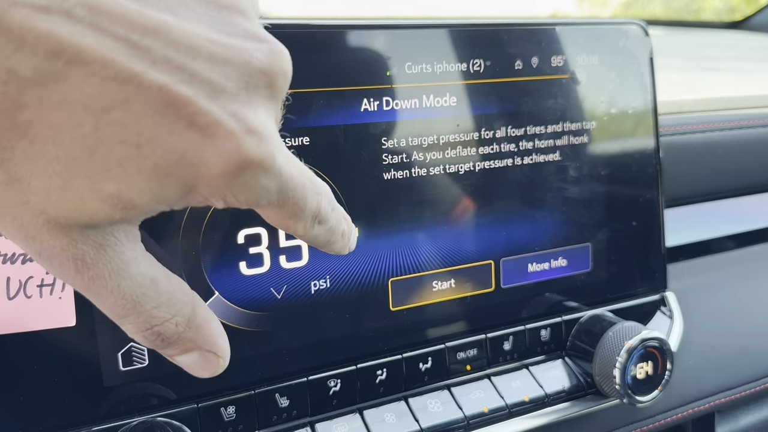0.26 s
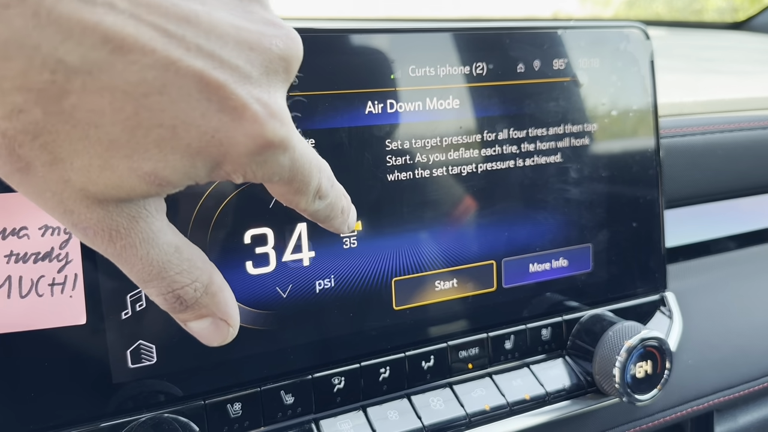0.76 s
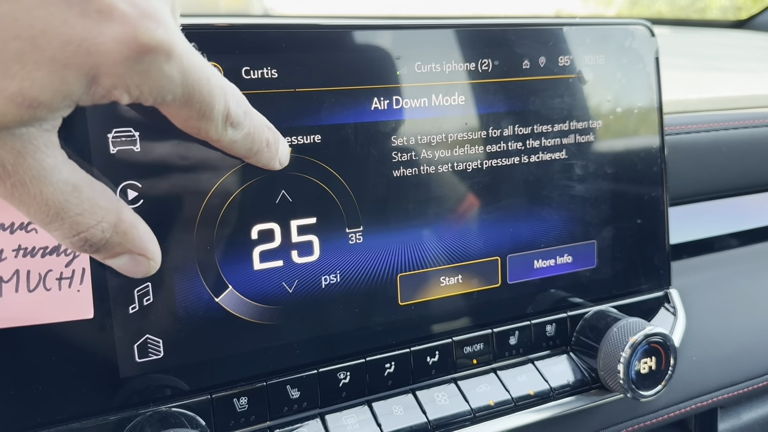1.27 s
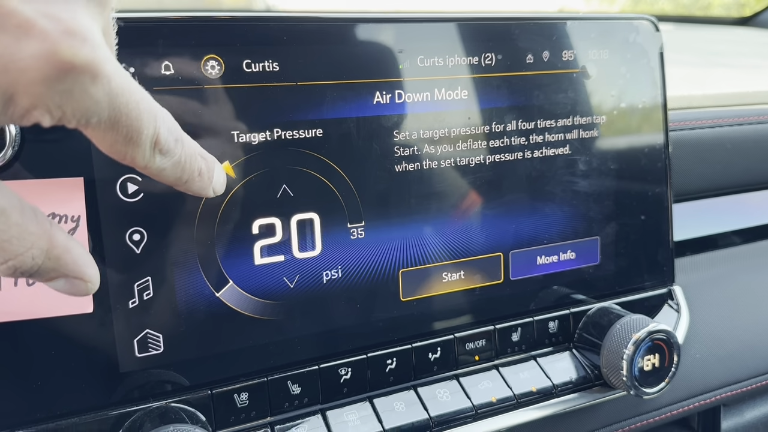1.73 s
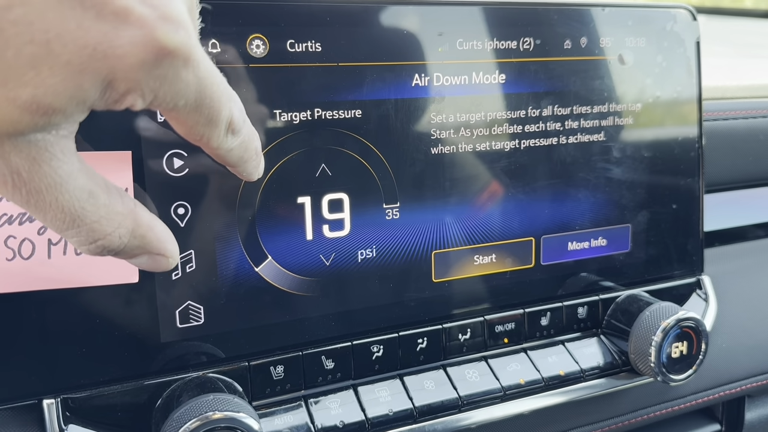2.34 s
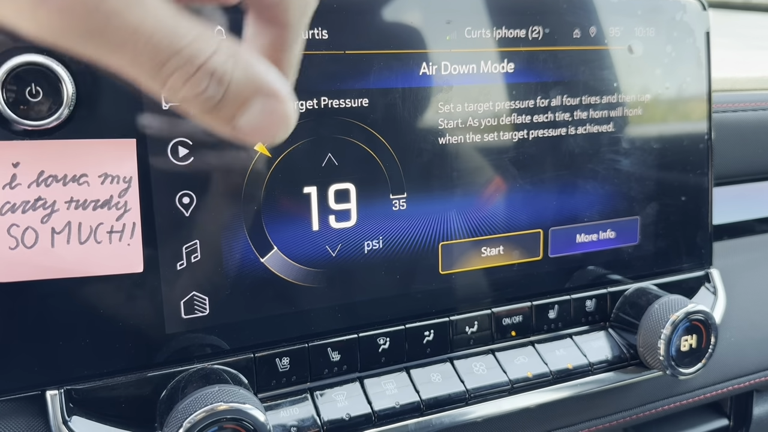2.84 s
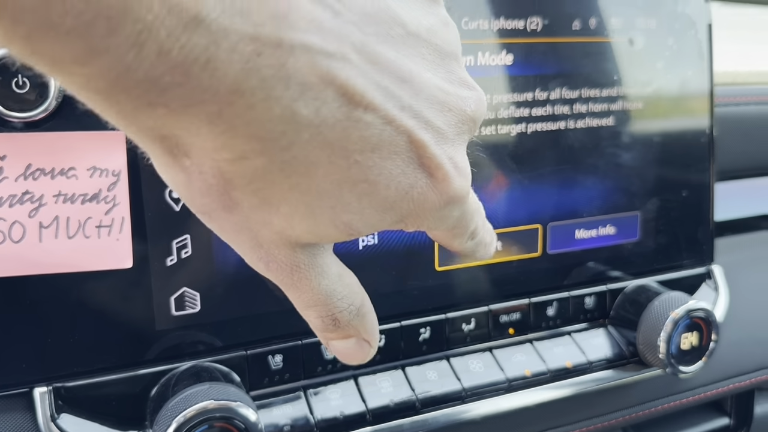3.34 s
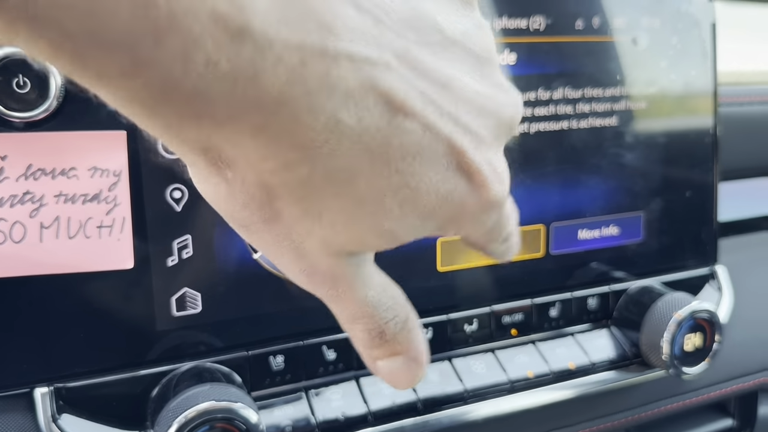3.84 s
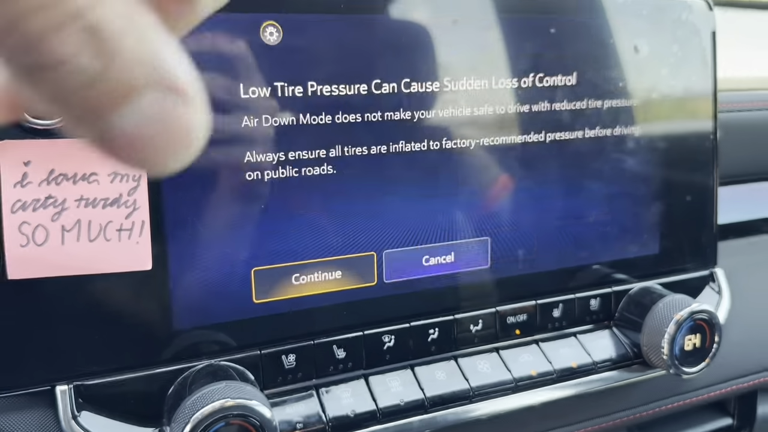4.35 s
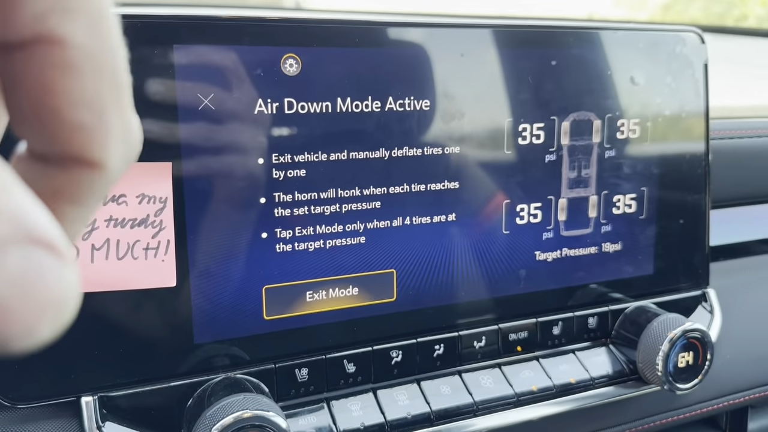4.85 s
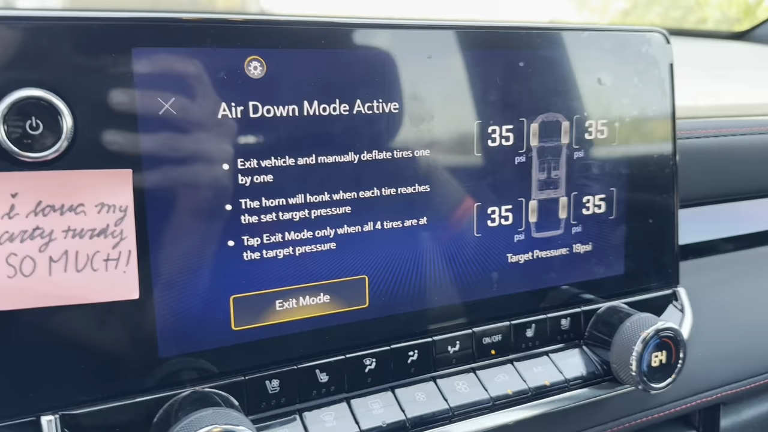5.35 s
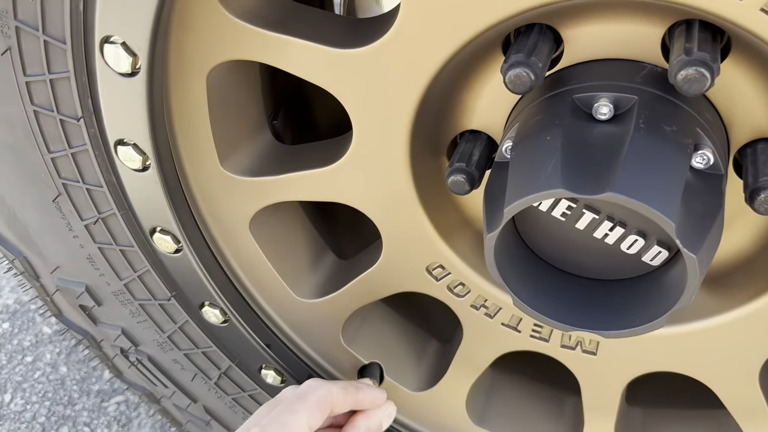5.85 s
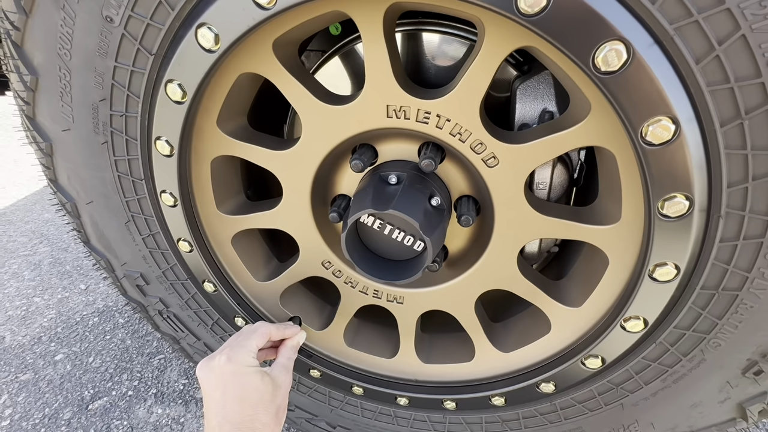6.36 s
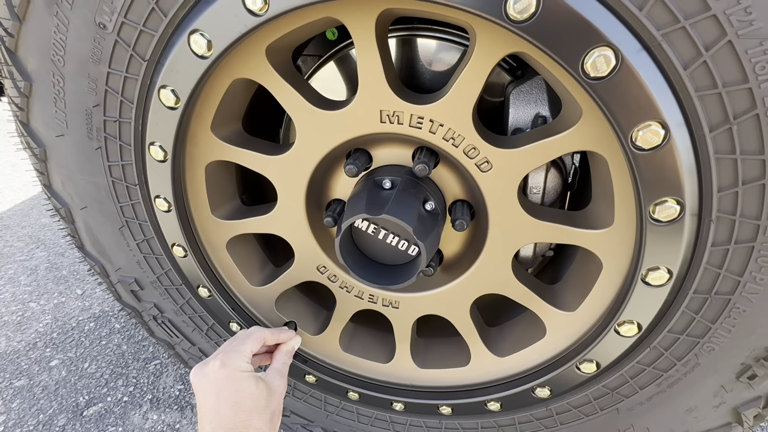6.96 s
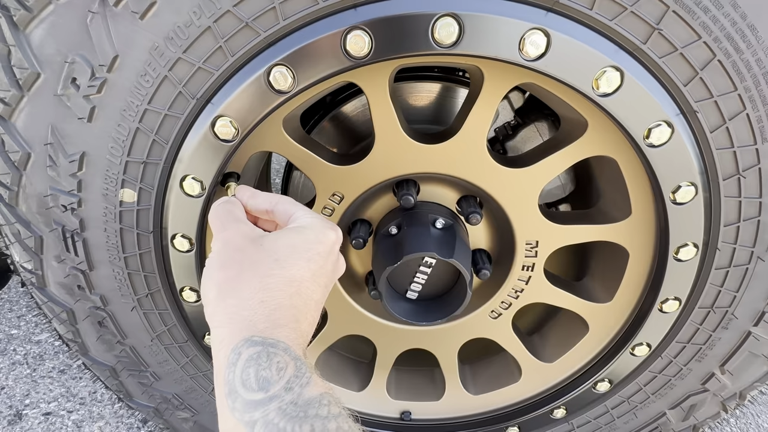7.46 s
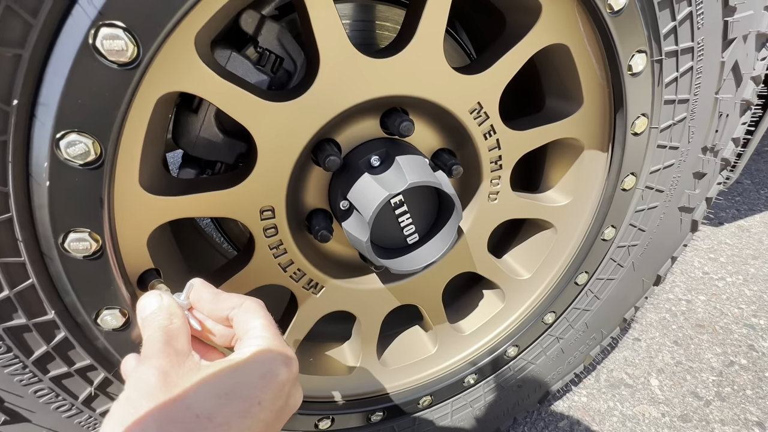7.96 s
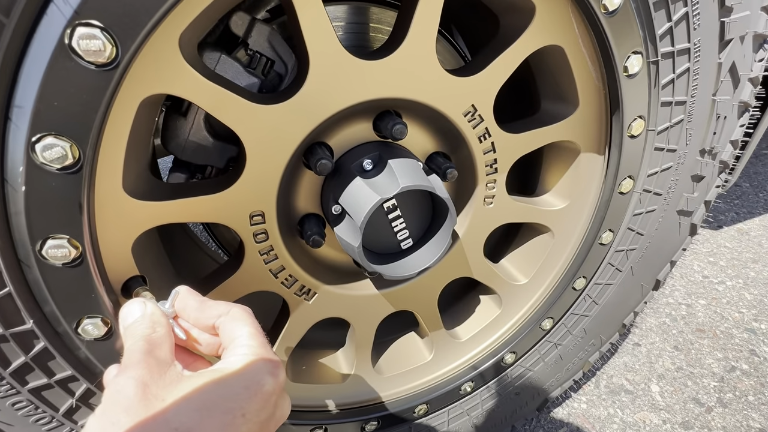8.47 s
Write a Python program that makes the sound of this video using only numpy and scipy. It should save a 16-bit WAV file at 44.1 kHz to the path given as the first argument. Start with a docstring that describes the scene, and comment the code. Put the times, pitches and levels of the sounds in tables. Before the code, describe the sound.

Quiet cabin idle and faint vent air give way to four close, loud jets of air escaping tires, the last one crackling and fluttering.

```python
"""In the cabin of an idling vehicle: engine hums from sine waves, rumble, vent noise and faint hiss
from coloured noise, and soft thumps from short low sines. Then outdoors, close to tire valves:
air jets of echoing noise at four positions, with a falling tone at the first; at the last a bright
band climbs and eddies of air buffet the microphone as snaps that drop into wobbles. The cabin returns
at the end. Short fades through silence interrupt the cabin and join the scenes."""
import sys
import numpy as np
from scipy import signal
from scipy.fft import rfft, irfft, next_fast_len
from scipy.io import wavfile

SR = 44100
rng = np.random.default_rng(int(sys.argv[2]) if len(sys.argv) > 2 else 0)


def generate_wav(signal):
    """Clip the signal to [-1, 1] and save it as 16-bit WAV at the path in sys.argv[1]."""
    frames = np.transpose(np.atleast_2d(signal))
    scaled = np.clip(frames, -1, 1) * 32767
    pcm = np.round(scaled).astype(np.int16)
    wavfile.write(sys.argv[1], SR, pcm)


N = 383669
TIME = np.arange(N) / SR

# Moments of silence, in the cabin and between positions. Column: time_s
SILENCES_S = [1.937, 4.47, 5.669, 6.071, 7.403, 7.804, 8.637]
FADE_S = 0.033
CUTOFF_HZ = 15850   # top of the treble

FIRING_HZ = 24.97
# Engine hums at multiples of the firing rate. Columns: multiple, cabin_level_db, outside_level_db
ENGINE_ORDERS = [(2, -43.5, -44), (3, -46, -45), (4, -49, -42.5), (5, -47.5, -43.5), (6, -61, -45.5)]
# Steady accessory hums and a thin whine. Columns: pitch_hz, level_db
CABIN_HUMS = [(114.5, -43.5), (3128, -84.5)]
# Colour of the cabin rumble. Columns: frequency_hz, level_db_per_hz
CABIN_RUMBLE_COLOUR = [(20, -33.5), (40, -6.5), (130, -8), (160, -18.5), (300, -47), (1000, -120)]
# Loudness of the cabin rumble over time. Columns: time_s, level_db
CABIN_RUMBLE_LEVEL = [(0, -43), (.4, -42), (3.5, -39), (4.7, -39), (5.66, -37), (8.64, -52)]
# Colour of the air vents. Columns: frequency_hz, level_db_per_hz
VENT_COLOUR = [(150, -9.5), (450, -11), (750, -15), (2150, -31), (2900, -40), (5000, -47.5), (8500, -57.5),
               (12000, -64.5), (15000, -72.5)]
# Resonances of the vent ducts. Columns: centre_hz, boost_db
DUCT_RINGS = [(1350.0, 4.5), (1960.0, 4.0), (3130.0, 3.5)]
VENT_DB, LAST_VENT_DB = -46, -36   # the vents are louder in the closing scene
# Airy swishes. Columns: start_s, rise_s, level_db, centre_hz, width_ratio
AIRY_SWISHES = [(0.0, .04, -61.0, 2250.0, 1.7), (4.62, .22, -78.0, 6500.0, 1.12),
                (4.55, .3, -66.0, 2200.0, 1.7)]
SWISH_DECAY_S = 0.25
# Faint rustles of hiss. Columns: full_level_at_s, hold_s, level_db
HISS_SWELLS = [(0.0, .26, -77), (.797, .005, -77), (2.867, .02, -69.5), (3.088, 0.053, -70),
               (3.955, 0.054, -71), (4.073, .05, -67), (4.15, 0.19, -70.5), (4.405, .015, -77),
               (5.23, 0.079, -60), (5.34, 0.17, -62.5), (5.58, 0.084, -69), (8.635, .06, -57)]
# Colour of those rustles. Columns: frequency_hz, level_db_per_hz
HISS_COLOUR = [(3000, -8), (7000, -7), (8900, 0), (11500, -6), (15600, -7.5)]
SWELL_RISE_DB_PER_S, SWELL_FALL_DB_PER_S = 279, 250
# Soft pushes on the body. Columns: start_s, envelope_peak_db
BODY_THUMPS = [(2.306, -25.5), (2.758, -27), (3.076, -25.5), (4.957, -25), (5.4, -22.5), (5.578, -24.5)]
THUMP_HZ, THUMP_RISE_S = 70, 0.012

# One row per valve position. Columns: jet_start_db, jet_end_db, rumble_db
VALVE_LEVELS = [(-16.5, -18.5, -31.5), (-19.0, -19, -34.5), (-19, -19.5, -39.5), (-20.0, -20.5, -45)]
# Colour of the valve jet, one list per position. Columns: frequency_hz, level_db_per_hz
JET_COLOURS = [
    [(500, -13), (1750, -14.5), (2000, -9), (2800, -5.5), (4800, -10.5), (6700, -4.5), (7900, -8),
     (11300, 0.5), (13800, 0), (15600, -1.5)],
    [(700, -13.5), (1900, -14), (3000, -4.5), (3900, -8.5), (6600, -9.5), (11000, -2.5), (13600, -3),
     (14900, -5.5), (15600, -4)],
    [(500, -19.5), (1400, -24), (2600, -8.5), (5900, -5.5), (8400, -5.5), (9700, -2), (11800, -5.5),
     (15600, -5.5)],
    [(500, -21), (1800, -15.5), (2500, -15), (4000, -9), (7400, -1), (9500, -2), (11500, -7), (15600, -4)],
]
# Narrow boosts and dips in the jet's colour, one list per position. Columns: centre_hz, boost_db
JET_PEAKS = [
    [],
    [(2420, -6.0), (3490, -9.0), (3890, -10.0), (15480, 4.0)],
    [(4880, -8.0)],
    [(7530, 2.0)],
]
PEAK_WIDTH = 0.032   # width of these peaks and the duct rings, as a share of the centre frequency
# Colour of the rumble outdoors. Columns: frequency_hz, level_db_per_hz
OUTSIDE_RUMBLE_COLOUR = [(20, -39), (45, -9.5), (90, 5), (130, 0), (280, -10.5), (500, -15.5), (900, -45),
                         (3000, -100)]
# Hums outdoors, one list per position. Columns: pitch_hz, level_db
OUTSIDE_HUMS = [
    [(73.0, -32), (117.0, -38), (175.0, -39)],
    [(90.0, -46)],
    [],
    [],
]
WHEEL_ECHO_DB, ECHO_PEAK_S = -14.0, 0.0012   # level of the wheel echoes; delay of the strongest echoes
RIPPLE_DB, RIPPLE_CHANGES_PER_S = -13.0, 9.0   # wandering ripples in the hiss colour
# A short soft tone. Columns: start_s, end_s, from_hz, to_hz, level_db
SOFT_FALL = (5.79, 5.95, 695.0, 635.0, -40.0)
# A bright band that climbs at the last valve. Columns: from_hz, to_hz, level_db, width_ratio
CLIMBING_BAND = (6800, 7450, -30, 1.07)

# Eddies of the jet, envelope levels. Columns: start_s, snap_db, wobble_peak_db
JET_EDDIES = [(7.842, -14.5, -35), (7.876, -19, -31), (7.894, -8.5, -24.5), (7.987, -19, -21.5),
              (8.0, -20, -34), (8.031, -14.5, -34), (8.054, -9.5, -23.5), (8.1, -17.5, -31.5),
              (8.247, -16, -28), (8.321, -16.5, -32), (8.363, -14.5, -22.5), (8.38, -19, -24),
              (8.391, -23.5, -29), (8.43, -6.5, -34), (8.453, -7.5, -25.5), (8.473, -15, -25.5),
              (8.547, -15.5, -33), (8.567, -19, -27.5)]
SNAP_RISE_S, SNAP_DECAY_S, WOBBLE_RISE_S = 0.00047, 0.0016, 0.0092
WOBBLE_HZ, SNAP_EXTRA_HZ = 53.2, 1662   # final pitch, and how far above it the snap starts
SLOWING_S, SLOWING_SPREAD_DB = 0.003044, 4.64   # middle time scale of the pitch fall; its random spread
STIR_DB, STIR_S = -10, 0.0047   # rough airflow around each snap: level relative to the snap, fade time
# Colour of the rough airflow. Columns: frequency_hz, level_db_per_hz
STIRRED_COLOUR = [(100, -9), (400, 6), (1200, 3.5), (2000, -5), (3000, -42)]
WAKE_DB, WAKE_RISE_S = -5.5, 0.019   # lumpy wake after each eddy: level relative to its wobble, rise
# Colour of the wake. Columns: frequency_hz, level_db_per_hz
LUMPY_WAKE_COLOUR = [(80, -1), (300, -11.5), (700, -25)]

# Stereo balance in the cabin. Columns: frequency_hz, left_minus_right_db, likeness_0_to_1
PAIR_CABIN = [(40, 1.5, 0.88), (500, 2.5, 0.85), (1020, 2, 0.35), (1700, -5.5, 0.35), (1900, -1, .45),
              (7000, 5.5, 0.3), (8700, -.5, 0.93), (10800, 0, 0.99)]
# Stereo balance, first valve. Columns: frequency_hz, left_minus_right_db, likeness_0_to_1
PAIR_FIRST = [(60, 1.5, 0.88), (1400, 0.5, 0.35), (1900, 0, 0.88), (3100, 0, 0.9), (3800, 2.5, 0.4),
              (4300, 0, 0.92), (6000, 1, 0.85), (7700, 3, 0.55), (11300, 0, 1), (14500, 0, .96)]
# Stereo balance, second valve. Columns: frequency_hz, left_minus_right_db, likeness_0_to_1
PAIR_SECOND = [(60, 1.5, .8), (1300, 3, .3), (2600, -4, .45), (2950, 0, .99), (3300, 1, .6), (3900, 0, .92),
               (5700, 1, .2), (7200, 1, .85), (8500, 2, .25)] + PAIR_FIRST[-2:]
# Stereo balance, third valve. Columns: frequency_hz, left_minus_right_db, likeness_0_to_1
PAIR_THIRD = [(60, -6, 0.7), (1000, 0, 0.2), (2300, 7, 0.45), (3200, 0, 1), (3600, 0, .99), (4000, -1, .2),
              (5800, -9.5, 0.6), (7600, -5, 0.75), (13400, 0, 1)]
# Stereo balance, fourth valve. Columns: frequency_hz, left_minus_right_db, likeness_0_to_1
PAIR_FOURTH = [(1760, -4, 0.6), (2600, -1, 0.35), (3800, -1, 0.88), (4900, -5.5, 0.3), (6900, -9, 0.65),
               (7600, -6, .92), (9400, .5, 0.99), (10700, -1, 0.7), (13400, 0, 1)]
# Stereo balance of the eddies. Columns: frequency_hz, left_minus_right_db, likeness_0_to_1
PAIR_EDDY = [(60, -17.5, 0.78), (317, -15, 0.79), (564, 1, 1), (1600, -3.5, 0.27)]
# The microphone ports are a few centimetres apart, so the right one leads or lags in phase.
# Right port's lead in the cabin. Columns: frequency_hz, lead_half_turns
LEAD_CABIN = [(0, 0), (1650, -.95), (1850, -.1), (6900, -.3), (7700, -1.1), (8000, -2), (9000, -2),
              (10700, -1), (12000, -1), (13500, 0)]
# Right port's lead, first valve. Columns: frequency_hz, lead_half_turns
LEAD_FIRST = [(0, 0), (2500, -.1), (2950, -1), (3850, -1), (4050, -2), (6300, -2.1), (7650, -3), (7900, -2),
              (11100, -1), (11600, -1), (14300, 0), (15800, .3)]
# Right port's lead, second valve. Columns: frequency_hz, lead_half_turns
LEAD_SECOND = [(0, 0), (1300, -.7), (2500, -.4), (2950, -1),
               (3400, -1.3)] + LEAD_FIRST[3:5] + [(5900, -2.1), (6600, -2.6), (7200, -2)] + LEAD_FIRST[7:]
# Right port's lead, fourth valve; the third shares its upper part. Columns: frequency_hz, lead_half_turns
LEAD_LATER = [(1700, -.2), (2900, -1), (3250, 0), (6800, .6), (7700, .1), (8200, .6), (9400, 1), (10500, 0),
              (11500, 0), (13200, -1), (13700, -1), (15300, -2)]
# Right port's lead, third valve. Columns: frequency_hz, lead_half_turns
LEAD_THIRD = [(0, 0), (2500, .2), (2950, 1), (3650, 1), (5000, 2), (5800, 2.8),
              (7500, 2)] + [(hz, half + 2) for hz, half in LEAD_LATER[5:]]
# Right port's lead for the eddies. Columns: frequency_hz, lead_half_turns
LEAD_EDDY = [(0, .3), (300, .5), (600, 1), (1200, 1.75), (1600, 1.75)]

CABIN_PAIR = (PAIR_CABIN, LEAD_CABIN)
VALVE_PAIRS = [(PAIR_FIRST, LEAD_FIRST), (PAIR_SECOND, LEAD_SECOND),
               (PAIR_THIRD, LEAD_THIRD), (PAIR_FOURTH, LEAD_LATER)]
EDDY_PAIR = (PAIR_EDDY, LEAD_EDDY)


def amp(db):
    """Turn decibels into a gain."""
    return 10 ** (np.asarray(db) / 20)


def at_hz(points, hz):
    """Read every column of a table on a log-frequency axis."""
    table_hz, *columns = np.transpose(points)
    return [np.interp(np.log(hz + 1), np.log(table_hz), column) for column in columns]


def between(start_s, end_s):
    """Sample range between two times."""
    return slice(round(start_s * SR), min(round(end_s * SR), N))


def hump(t, rise_s):
    """A shape that rises to 1 at rise_s, then dies away."""
    return t / rise_s * np.exp(1 - t / rise_s)


def drift(n, rate):
    """Slow chance: a new random value about rate times a second (60 at most), joined by straight lines."""
    knots = rng.standard_normal(int(n / SR * 60) + 3)
    return np.interp(np.arange(n) * min(rate, 60) / SR, np.arange(len(knots)), knots)


def heard_by_pair(shared, own, pair):
    """Spectra at two ports: a shared part with level and phase offset, plus a part only the right gets."""
    balance, phase = pair
    hz = np.linspace(0, SR / 2, len(shared))
    tilt_db, alike = at_hz(balance, hz)
    alike = np.clip(alike, 0, 1)
    lead = np.pi * np.interp(hz, *np.transpose(phase))
    right = alike * np.exp(1j * lead) * shared + np.sqrt(1 - alike ** 2) * own
    return np.array([amp(tilt_db / 2) * shared, amp(-tilt_db / 2) * right])


def noise(n, spectrum, pair, patchy_db, rate, peaks=(), echoes=False):
    """Coloured stereo noise, rms 1; overlapping wide bands flicker partly together, partly alone."""
    m = 2 * next_fast_len(n // 2 + 1)
    hz = np.linspace(0, SR / 2, m // 2 + 1)
    both = heard_by_pair(*rfft(rng.standard_normal((2, m))), pair)
    both = both * amp(at_hz(spectrum, hz)[0])
    boost_db = sum(db / (1 + (2 * (hz / peak_hz - 1) / PEAK_WIDTH) ** 2) for peak_hz, db in peaks)
    both = both * amp(boost_db)
    if echoes:
        both = both * wheel_echoes(m)
    both = both * (hz > 20) * (hz < CUTOFF_HZ)
    out = 0
    together = drift(n, rate / 4)
    place = np.clip(np.log2(hz / 60 + 1e-9) / 1.6, 0, 5)   # band number, each 1.6 octaves apart
    for k in range(6):
        band = irfft(both * np.clip(1 - abs(place - k), 0, 1), m)[:, :n]
        out = out + band * amp(patchy_db * (0.4 * together + drift(n, rate)))
    return out / np.sqrt(np.mean(out ** 2))


def hums(n, tones, waver_db):
    """Steady sine tones whose levels waver slowly."""
    t = np.arange(n) / SR
    out = 0
    for hz, db in tones:
        level = np.sqrt(2) * amp(db + waver_db * drift(n, 5.08))
        out = out + level * np.sin(2 * np.pi * (hz * t + rng.random()))
    return out


def engine(n, column):
    """Engine hum: sines at low multiples of the firing rate."""
    return hums(n, [(row[0] * FIRING_HZ, row[column]) for row in ENGINE_ORDERS], waver_db=3.0)


def cabin_rumble():
    """Deep coloured noise heard through the closed body."""
    level = amp(np.interp(TIME, *np.transpose(CABIN_RUMBLE_LEVEL)))
    return level * noise(N, CABIN_RUMBLE_COLOUR, CABIN_PAIR, patchy_db=2.0, rate=6.5)


def vents():
    """Air rushing through ducts: broad noise with a few narrow resonances."""
    level = amp(np.where(TIME > SILENCES_S[-1], LAST_VENT_DB, VENT_DB))
    return level * noise(N, VENT_COLOUR, CABIN_PAIR, patchy_db=0.7, rate=3.0, peaks=DUCT_RINGS)


def swishes():
    """Airy swishes: bands of noise that rise in a straight line and die away smoothly."""
    out = np.zeros((2, N))
    t = TIME[:SR]   # each lasts one second
    for start_s, rise_s, db, hz, ratio in AIRY_SWISHES:
        start = round(start_s * SR)
        colour = [(hz / ratio, -20), (hz, 0), (hz * ratio, -30), (hz * ratio * 2, -90)]
        air = noise(SR, colour, CABIN_PAIR, patchy_db=1.0, rate=13.0)
        shape = np.minimum(t / rise_s, np.exp((rise_s - t) / SWISH_DECAY_S))
        out[:, start:start + SR] += amp(db) * shape * air
    return out


def hiss_swells():
    """Rustles of hiss: each rises, holds and falls at steady dB rates; their powers add."""
    power = 0
    for full_s, hold_s, db in HISS_SWELLS:
        early = np.clip(full_s - TIME, 0, None)
        late = np.clip(TIME - full_s - hold_s, 0, None)
        power = power + amp(db - SWELL_RISE_DB_PER_S * early - SWELL_FALL_DB_PER_S * late) ** 2
    return np.sqrt(power) * noise(N, HISS_COLOUR, CABIN_PAIR, patchy_db=2.0, rate=12.0)


def thumps():
    """Soft pushes on the body: two or three cycles of a low sine under a hump."""
    out = np.zeros(N)
    for start_s, db in BODY_THUMPS:
        t = np.clip(TIME - start_s, 0, None)
        out += amp(db) * hump(t, THUMP_RISE_S) * np.sin(2 * np.pi * THUMP_HZ * t)
    return out


def cabin():
    """Idle heard through the closed body, silent while the valves are heard."""
    out = cabin_rumble() + vents() + engine(N, column=1) + hums(N, CABIN_HUMS, waver_db=0.5)
    out = out + swishes() + hiss_swells() + thumps()
    return out * ((TIME < SILENCES_S[2]) | (TIME > SILENCES_S[-1]))


def spray():
    """A random run of short echoes with energy 1."""
    taps = rng.standard_normal(512) * hump(TIME[:512], ECHO_PEAK_S)
    return taps / np.sqrt(np.sum(taps ** 2))


def wheel_echoes(m):
    """Direct sound plus dense fixed echoes off the wheel, which ripple the jet's colour."""
    return 1 + amp(WHEEL_ECHO_DB) * rfft(spray(), m)


def shifting_ripples(jet):
    """Short echoes whose strength and sign wander, so the ripples in the colour never sit still."""
    n = jet.shape[1]
    echoes = signal.fftconvolve(jet, spray()[None])[:, :n]
    return amp(RIPPLE_DB) * drift(n, RIPPLE_CHANGES_PER_S) * echoes


def valve_jet(n, k):
    """Turbulent air rushing through a valve: bright noise with narrow boosts, dips and echoes."""
    start_db, end_db, _ = VALVE_LEVELS[k]
    air = noise(n, JET_COLOURS[k], VALVE_PAIRS[k], patchy_db=1.13, rate=25.43,
                peaks=JET_PEAKS[k], echoes=True)
    jet = amp(np.linspace(start_db, end_db, n)) * air
    return jet + shifting_ripples(jet)


def outside_idle(n, k):
    """The engine heard from outside: rumbling noise, firing-rate hums and steady tones."""
    rumble = noise(n, OUTSIDE_RUMBLE_COLOUR, VALVE_PAIRS[0], patchy_db=3.0, rate=10.58)
    rumble = amp(VALVE_LEVELS[k][2]) * rumble
    return rumble + engine(n, column=2) + hums(n, OUTSIDE_HUMS[k], waver_db=0.5)


def valves():
    """Each position in turn: a valve jet over the idle, with the climbing band at the last."""
    out = np.zeros((2, N))
    for k in range(len(VALVE_LEVELS)):
        span = between(SILENCES_S[k + 2], SILENCES_S[k + 3])
        n = len(TIME[span])
        out[:, span] = valve_jet(n, k) + outside_idle(n, k)
    out[:, span] += gliding_band(n, VALVE_PAIRS[-1])
    return out


def falling_tone():
    """One soft sine that glides down under a smooth hump."""
    start_s, end_s, from_hz, to_hz, db = SOFT_FALL
    part = np.clip((TIME - start_s) / (end_s - start_s), 0, 1)
    turns = np.cumsum(from_hz + (to_hz - from_hz) * part) / SR
    shape = np.sqrt(2 * np.sin(np.pi * part) + 1e-12)
    return amp(db) * shape * np.sin(2 * np.pi * turns)


def gliding_band(n, pair):
    """A narrow band of noise whose whole spectrum slides upward."""
    from_hz, to_hz, db, ratio = CLIMBING_BAND
    colour = [(from_hz / ratio, -20), (from_hz, 0), (from_hz * ratio, -20)]
    band = noise(n, colour, pair, patchy_db=2.0, rate=10.0)
    turns = np.cumsum(np.linspace(0, to_hz - from_hz, n)) / SR
    return amp(db) * np.real(signal.hilbert(band) * np.exp(2j * np.pi * turns))


def buffeting():
    """Eddies sweep past the ports: snaps fall fast into low wobbles, with rough airflow and a lumpy wake."""
    span = between(SILENCES_S[5], SILENCES_S[6])
    time = TIME[span]
    n = len(time)
    hits, stirred, wake_power = 0, 0, 0
    for (start_s, snap_db, wobble_db), (phase, size) in zip(JET_EDDIES, rng.random((len(JET_EDDIES), 2))):
        t = np.clip(time - start_s, 0, None)
        # the pitch falls from snap to wobble as the eddy grows
        slowing_s = SLOWING_S * amp(SLOWING_SPREAD_DB * (size - 0.5))
        extra_turns = SNAP_EXTRA_HZ * slowing_s * (1 - 1 / np.sqrt(1 + 2 * t / slowing_s))
        turns = WOBBLE_HZ * t + extra_turns
        shape = amp(snap_db) * np.exp(-t / SNAP_DECAY_S) + amp(wobble_db) * hump(t, WOBBLE_RISE_S)
        onset = np.minimum(t / SNAP_RISE_S, 1)
        hits = hits + onset * shape * np.sin(2 * np.pi * (turns + phase))
        distance_s = abs(time - start_s - SNAP_DECAY_S)
        stirred = stirred + amp(snap_db + STIR_DB) * np.exp(-distance_s / STIR_S)
        wake_power = wake_power + (amp(wobble_db + WAKE_DB) * hump(t, WAKE_RISE_S)) ** 2
    m = 2 * next_fast_len(n)
    out = irfft(heard_by_pair(rfft(hits, m), 0, EDDY_PAIR), m)[:, :n]
    out += stirred * noise(n, STIRRED_COLOUR, EDDY_PAIR, patchy_db=2.0, rate=54.0)
    out += np.sqrt(wake_power) * noise(n, LUMPY_WAKE_COLOUR, EDDY_PAIR, patchy_db=0.5, rate=42.0)
    full = np.zeros((2, N))
    full[:, span] = out
    return full


def scene():
    """All sources, faded out and in around every moment of silence."""
    gap_s = np.min(abs(TIME - np.array(SILENCES_S)[:, None]), axis=0)
    fade = np.clip(gap_s / FADE_S, 0, 1) ** 0.95
    return (cabin() + valves() + falling_tone() + buffeting()) * fade


def record(dry):
    """Cut the top of the treble steeply with a low-pass filter."""
    low_pass = signal.ellip(12, 0.5, 70, CUTOFF_HZ, fs=SR, output="sos")
    return signal.sosfilt(low_pass, dry)


dry = scene()
out = record(dry)
generate_wav(out)
```